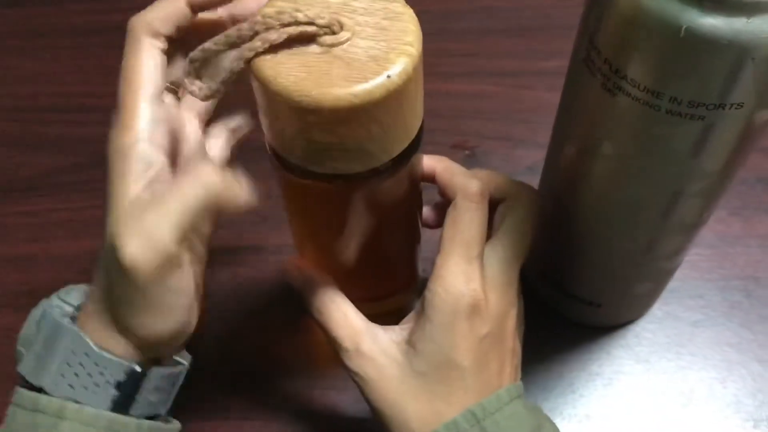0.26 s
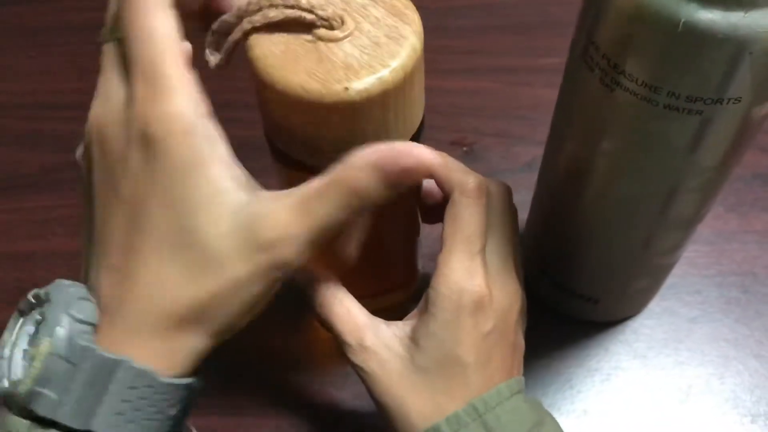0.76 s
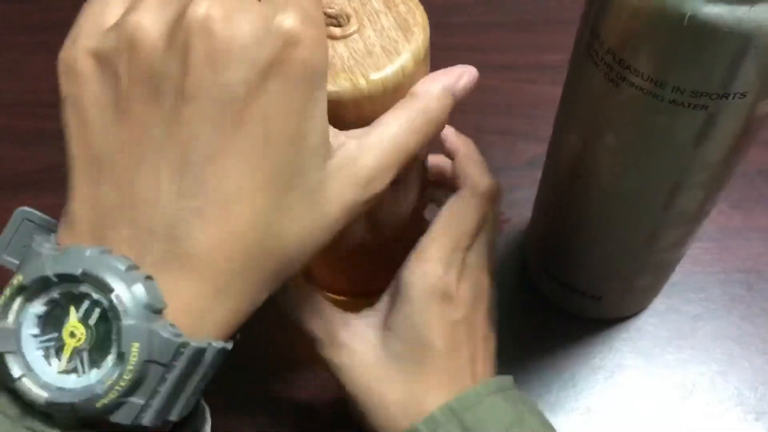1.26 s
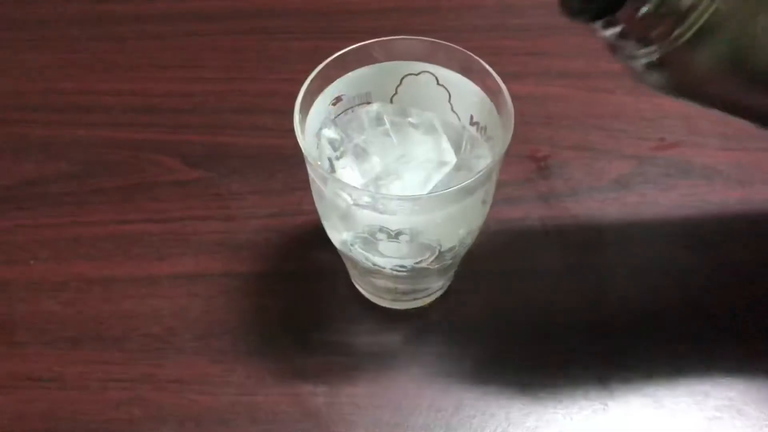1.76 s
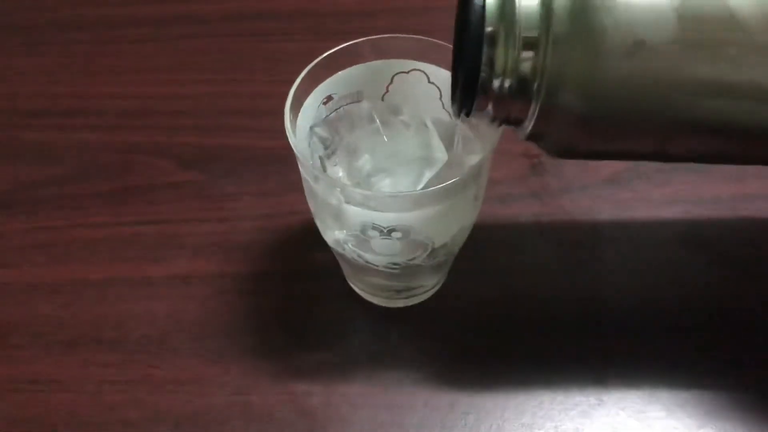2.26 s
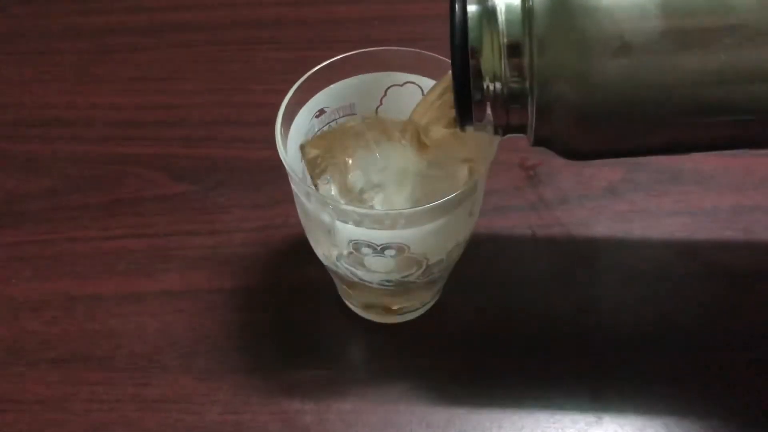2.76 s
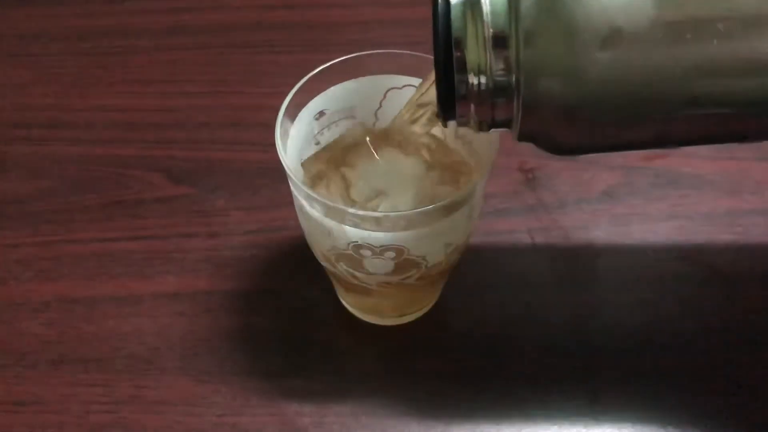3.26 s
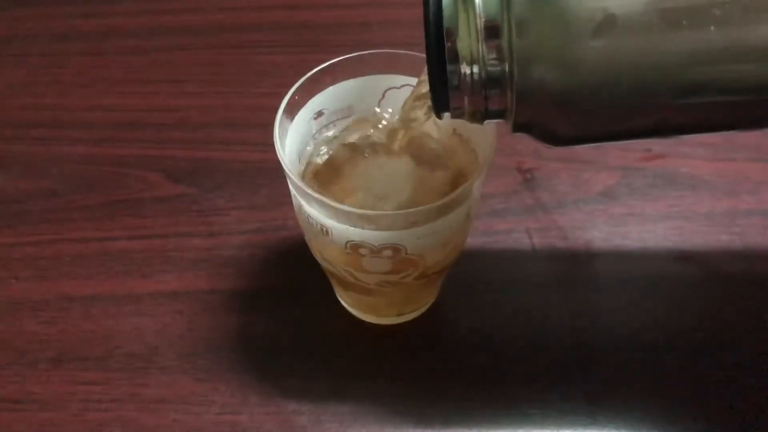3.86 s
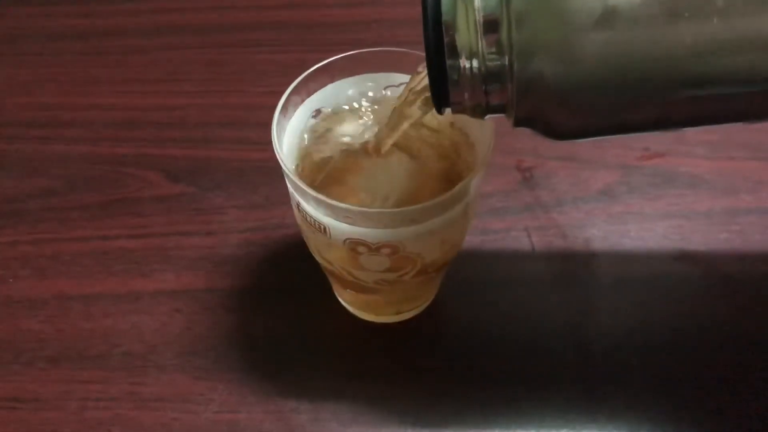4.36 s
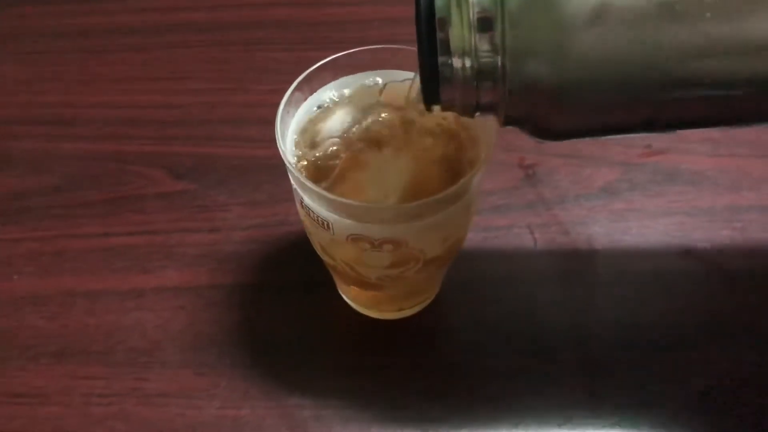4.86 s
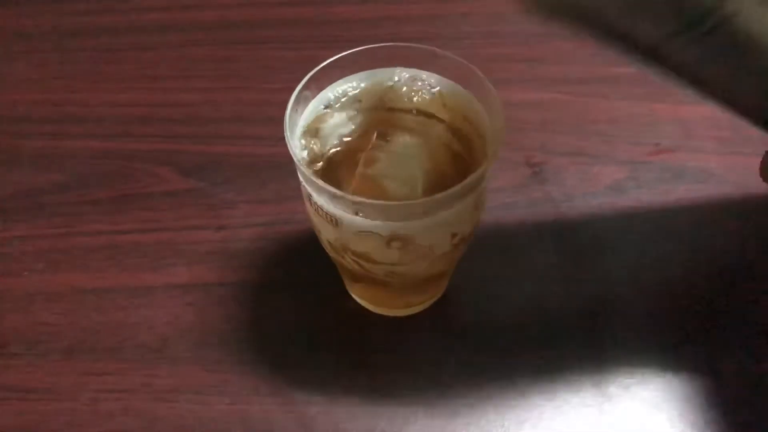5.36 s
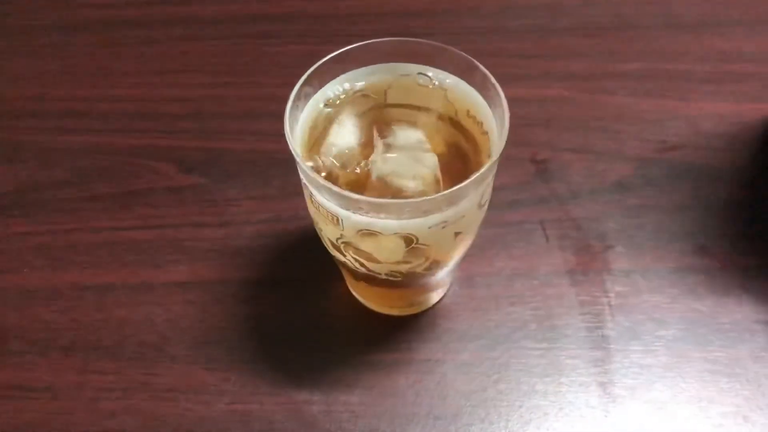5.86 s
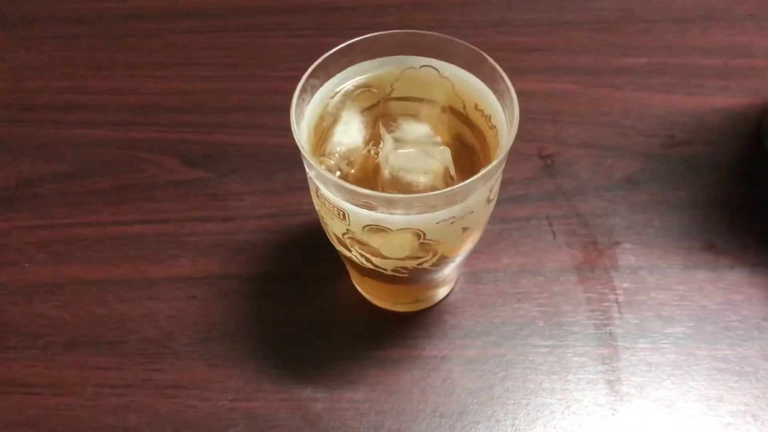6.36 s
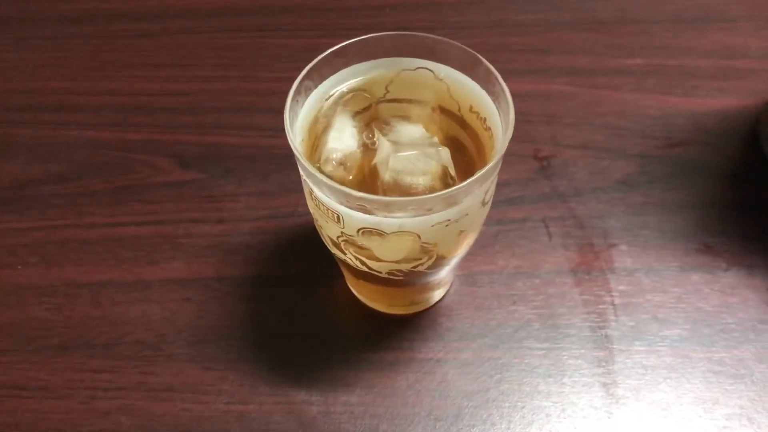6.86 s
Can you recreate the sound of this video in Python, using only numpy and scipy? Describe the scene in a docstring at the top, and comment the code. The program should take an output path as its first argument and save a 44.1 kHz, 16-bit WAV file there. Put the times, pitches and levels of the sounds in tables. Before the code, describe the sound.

Dry ticks of a glass bottle and woody knocks come first, close to the microphone, then a quiet gap. A hard steel-on-glass clink leads into a brief, lively pour with plinking bubbles, knocking cubes and tiny ice cracks. The splash softens as the glass fills, a faint hollow gurgle ends the pour, and one dull table thud follows. Small indoor room, slight reflections, steady low hum.

```python
"""In a small room, at a wooden table, a hand taps and shifts a capped glass bottle, with a rustle of sleeve.
A steel flask knocks on the rim of a tumbler, pours tea over ice, and is set down. A machine hums throughout.
Knocks, taps and clinks are fading tones (the ways an object rings) mixed with short bursts of noise.
The pour is swarms of chirping bubbles, a noisy splash and the drumming of the stream on the cubes;
the larger bubbles, the clinks and the sharper cracks are placed one by one."""
import sys
import numpy as np
from scipy import signal
from scipy.fft import rfft, irfft
from scipy.io import wavfile

SR = 44100
rng = np.random.default_rng(int(sys.argv[2]) if len(sys.argv) > 2 else 0)


def dump_mix(stems):
    """Bounce the given channels to the path in sys.argv[1] as a 16-bit WAV at rate SR."""
    frames = np.atleast_2d(stems).T  # one column per channel
    limited = np.clip(frames, -1, 1)  # hard clip at full scale
    pcm = np.round(limited * 32767).astype(np.int16)
    wavfile.write(sys.argv[1], SR, pcm)


N = 312669
T = np.arange(N) / SR  # time in the scene, seconds
AGE = np.arange(SR // 2) / SR  # time since a sound began, seconds

# How the tumbler rings when shoved or drummed on.
# Each row: pitch in Hz, level in dB, time to fall by 60 dB in seconds.
TUMBLER_MODES = [(247.3, 6, 0.095), (282, -2.5, 0.16), (539.3, -1.5, 0.096), (622, -19, 0.18),
                 (820, -10, 0.018), (1112, -13, 0.12)]
# Seconds: the tea first lands, the cubes lift off the bottom, the last drips start to die away.
POUR_S, FLOAT_S, DRY_S = 2.65, 3.82, 5.68


def undb(db):
    """Turn decibels into a gain."""
    return 10 ** (np.asarray(db) / 20)


def curve(rows):
    """Join rows of (seconds, value) by straight lines in time."""
    return np.interp(T, *np.transpose(rows))


def unit(x):
    """Scale to an rms (average strength) of 1."""
    return x / np.sqrt(np.mean(x ** 2))


def peak(x):
    """Scale to a peak of 1."""
    return x / np.abs(x).max()


def add(track, s, x):
    """Mix a sound into the track, starting at s seconds."""
    i = max(int(s * SR), 0)
    track[i:i + len(x)] += x[:max(N - i, 0)]


def cut(x, hz, kind, order=2):
    """Butterworth filter: keep the low, high or middle band of pitches."""
    sos = signal.butter(order, np.clip(hz, 10, SR / 2 - 10), kind, fs=SR, output="sos")
    return signal.sosfilt(sos, x)


def colour(x, points):
    """Shape the tone by (Hz, dB) points, with a filter that never sounds ahead of its input."""
    hz, db = np.transpose(points)
    grid = np.maximum(np.linspace(0, SR / 2, 2049), 1)
    gain = undb(np.interp(np.log(grid), np.log(hz), db))
    # Folding the cepstrum gives the minimum-phase filter, which responds as early as possible.
    cepstrum = irfft(np.log(gain))
    half = len(cepstrum) // 2
    folded = np.r_[cepstrum[0], 2 * cepstrum[1:half], np.zeros(half)]
    response = irfft(np.exp(rfft(folded)))[:half]
    return signal.fftconvolve(x, response)[:len(x)]


def fade(t60):
    """Die away smoothly, falling by 60 dB in t60 seconds."""
    return np.exp(-np.log(1000) * AGE / t60)


def burst(t60):
    """Fading noise, standing for countless ringing tones packed close together."""
    return rng.standard_normal(len(AGE)) * fade(t60)


def ring(modes, spread=0, uneven_db=0):
    """Fading tones of a struck object, a little different in pitch and strength at each blow if asked."""
    chance = rng.standard_normal((len(modes), 2))
    out = 0
    for k, ((hz, db, t60), (detune, uneven)) in enumerate(zip(modes, chance)):
        tone = np.sin(2 * np.pi * hz * (1 + spread * detune) * AGE)
        out = out + (-1) ** k * undb(db + uneven_db * uneven) * fade(t60) * tone
    return out


def bubble(hz, cycles, glide, count=1800):
    """An air bubble swells within a cycle and rings, its pitch rising as it nears the surface."""
    turns = hz * AGE[:count]
    life = turns / cycles  # 1 once the ring has fallen by 60 dB
    loudness = (1 - np.exp(-turns ** 2)) * np.exp(-np.log(1000) * life)
    return loudness * np.sin(2 * np.pi * turns * (1 + glide * np.minimum(life, 1) / 2))


def specks(rate, scatter_db):
    """Random single clicks of very uneven size, about `rate` of them a second."""
    size = undb(scatter_db * np.minimum(rng.exponential(size=N), 4))
    return (rng.random(N) < rate / SR) * size * rng.choice([-1, 1], N)


def swarm(rate, low_hz, high_hz, cycles, scatter_db, count=700):
    """Bubbles of random size and loudness, each pitched by its radius; scaled to rms 1."""
    out = np.zeros(N)
    for when, radius, size, life in rng.random((int(rate * N / SR), 4)):
        gain = undb(-scatter_db * np.log(size + 0.0018))
        hz = high_hz * (low_hz / high_hz) ** radius
        one = bubble(hz, cycles * (.5 + life), glide=.16, count=count)
        add(out, when * N / SR, gain * one)
    return unit(out)


def swell(start, end, rise_db_per_s, fall_db_per_s):
    """A gain that rises to 1, holds from start to end (seconds) and dies away."""
    before, after = np.maximum(start - T, 0), np.maximum(T - end, 0)
    return undb(-rise_db_per_s * before - fall_db_per_s * after)


def drone(hz, width_hz, steady):
    """A wavering low tone: a steady part plus a narrow band of rumble."""
    waver = [unit(cut(rng.standard_normal(N + SR), width_hz, "low")[SR:]) for _ in range(2)]
    phase = 2 * np.pi * np.cumsum(hz * np.ones(N)) / SR
    return unit((steady + waver[0]) * np.sin(phase) + waver[1] * np.cos(phase))


def background():
    """Low drones of a machine, the middle one swelling for a while, over the hiss of the room."""
    # Tone of the room hiss. Each row: pitch in Hz, level in dB.
    air_colour = [(59, -18), (100, 3), (140, -14.5), (202, -17.5), (224, -26), (315, -21.5), (433, -28.5),
                  (608, -27.5), (705, -29.5), (1550, -35.5), (2170, -40.5), (16000, -58)]
    # The 94.9 Hz drone swells: full from and until in seconds, rise and fall in dB per second.
    hum_swell = (4.18, 5.86, 19.4, 8.7)
    air = cut(colour(rng.standard_normal(N), air_colour), 158, "high", order=3)
    air = air / np.std(cut(air, 300, "high", order=4))  # its part above 300 Hz sets the level
    low = drone(61.7, width_hz=7, steady=2.0) * undb(-56.5)
    upper = drone(94.9, width_hz=8, steady=3.04) * undb(-49.5) * swell(*hum_swell)
    rumble = drone(104.6, width_hz=9.5, steady=1.76) * undb(-56.5)  # a rougher drone beside it
    return air * undb(-61) + cut(low + upper + rumble, 42.5, "high", order=4)


def sleeve():
    """Soft, grainy rustle of cloth that swells and fades with each move of the arm."""
    # Tone of the cloth. Each row: pitch in Hz, level in dB.
    cloth_colour = [(300, 13.5), (1200, 9.5), (4000, 2), (9000, -7), (15000, -23)]
    # Each row: loudest moment in seconds, level in dB, rise in seconds, fall in seconds.
    brushes = [(0.01, -55.5, .05, 0.039), (1.3, -61, 0.19, .1), (1.83, -62.5, 0.17, 0.39)]
    moves = np.zeros(N)
    for s, db, rise, fall in brushes:
        moves += undb(db) * np.exp(-((T - s) / np.where(T < s, rise, fall)) ** 2)
    return unit(colour(specks(rate=5000, scatter_db=1.5), cloth_colour)) * moves


def table():
    """The top booms at a pitch set by where it is loaded; soft contacts leave out its higher modes."""
    # Knocks. Each row: start in seconds, level in dB, boom pitch in Hz, contact cut-off in Hz.
    knocks = [(0.01, -27.5, 236, 1540), (.0770, -25.5, 213, 1020), (0.472, -34.5, 282, 980),
              (0.505, -27.5, 283, 1390), (.542, -29.5, 288, 1690), (.5570, -22, 210, 755),
              (0.575, -32, 220.6, 590), (.843, -38, 219, 705), (0.897, -38, 220, 1520),
              (1.18, -34.5, 217, 600), (6.34, -29.5, 274, 470)]
    # Ringing of the wood. Each row: pitch in Hz, level in dB, time to fall by 60 dB in seconds.
    wood_modes = [(161, -12, .18), (278, -5, .14), (512, -5, .1), (712, -8, .1), (830, -9, .08),
                  (1010, -9, .08)]
    middle_hz, stiff_db_per_hz = 213, -0.04  # away from its middle the top is stiffer: higher and weaker
    hard_db_per_khz = -10  # the harder the contact, the less boom
    out = np.zeros(N)
    for s, db, boom_hz, contact_hz in knocks:
        boom_db = -0.5 + hard_db_per_khz * contact_hz / 1000 + stiff_db_per_hz * (boom_hz - middle_hz)
        thud = peak(cut(burst(0.048), [260, 2200], "band", order=1))
        plate = undb(-14.5) * ring(wood_modes, spread=0.022) + thud
        boom = ring([(boom_hz, boom_db, .15)]) * (1 - fade(0.015))
        add(out, s, undb(db) * peak(cut(plate, contact_hz, "low", order=3) + boom))
    return out


def bottle():
    """Each tap of the fingers is a dry tick together with the ring of the bottle wall."""
    # Taps. Each row: start in seconds, level in dB, high ring over low ring in dB.
    taps = [(0.0181, -28, 0.5), (0.1007, -44, -9), (0.4693, -25.5, 10.5), (0.5061, -33, 4),
            (0.5163, -29, -1), (0.5726, -37.5, -7), (0.8406, -33, 3), (0.8769, -40.5, -8)]
    # Low and high ring of the wall. Each row: pitch in Hz, level in dB, time to fall by 60 dB in seconds.
    low_modes = [(2245, 6.5, 0.044), (2900, 2, 0.049), (3716, 4, 0.081)]
    high_modes = [(5400, -16, 0.046), (5670, 5.5, 0.032), (6030, 4, 0.024)]
    out = np.zeros(N)
    for s, db, tilt_db in taps:
        tick = cut(cut(burst(0.032), 680, "high", order=1), 8100, "low")
        low = undb(-tilt_db / 2) * ring(low_modes, spread=0.0084)
        high = undb(tilt_db / 2) * ring(high_modes, spread=0.0023)
        add(out, s, undb(db) * peak(peak(tick) + undb(-12.5) * (low + high)))
    return out


def rim():
    """Steel on glass: a hard crack, a short ring, and a thump as the blow reaches the table."""
    # Each row: start in seconds, level in dB, body in dB, treble edge in Hz, singing glass in dB.
    hits = [(2.2435, -12, -5, 9600, -58), (2.3893, -27.5, -6.5, 5460, -43)]
    # Tumbler and flask in contact. Each row: pitch in Hz, level in dB, time to fall by 60 dB in seconds.
    contact_modes = [(214, 1, .2), (247, -1, .2), (264, -4, .24), (515, 3, .07), (727, -11, .14),
                     (826, -8, .12), (1114, -7, .18), (1841, -11, .13), (4091, -16, .12), (4980, -17, .11),
                     (6304, -16, .1), (6788, -20, .11), (7434, -19, .1), (8489, -22, .12)]
    # Singing glass. Each row: pitch in Hz, level in dB, time to fall by 60 dB in seconds.
    glass_modes = [(8560, 0, .6), (12050, -3, .6)]
    # Tone of the crack. Each row: pitch in Hz, level in dB.
    crack_colour = [(300, -2), (1000, -30), (2200, 5), (3200, -8.5), (4300, -3), (6500, 0.5), (8400, -2.5),
                    (9500, -10.5), (16000, -7)]
    out = np.zeros(N)
    for s, db, body_db, edge_hz, sing_db in hits:
        crack = peak(colour(burst(0.0088) + undb(-12.0) * burst(0.048), crack_colour))
        crack = cut(crack, edge_hz, "low", order=1)
        thump = peak(cut(burst(0.075), [300, 1000], "band"))
        body = undb(-9) * ring(contact_modes) + undb(-2) * thump
        add(out, s, undb(db) * (crack + undb(sing_db) * ring(glass_modes)))
        add(out, s + 0.001126, undb(db + body_db) * body * (1 - fade(0.0021)))
    return out


def flask():
    """A soft, hollow gurgle as tea runs back inside the steel flask, made of a swarm of bubbles."""
    # The flask is tipped up: gurgle full from and until in seconds, rise and fall in dB per second.
    slosh = (5.25, 5.4, 22, 50)
    gurgle = swarm(rate=260, low_hz=700, high_hz=1250, cycles=50, scatter_db=2, count=3000)
    return gurgle * undb(-62.5) * swell(*slosh)


def clinks():
    """Wet cubes knock on each other and the glass: contact noise, ringing wall and hollow air above the tea."""
    # Each row: start in seconds, level in dB.
    hits = [(2.994, -24), (3.0281, -27.5), (3.1212, -26), (3.1455, -21.5), (3.4792, -33.5), (3.689, -28.5),
            (3.7667, -28.5), (3.805, -36), (5.1238, -40), (5.293, -39), (5.3365, -39.5), (5.5016, -42.5),
            (5.59, -33), (5.7027, -43), (5.7239, -38.5), (5.8036, -41), (5.82, -48), (5.8782, -43.5),
            (5.907, -40)]
    # Tone of the contact. Each row: pitch in Hz, level in dB.
    contact_colour = [(400, 19.5), (1400, 5), (3400, 10), (6000, 0), (10000, -3), (16000, -8)]
    # Wall of the filled tumbler. Each row: pitch in Hz, level in dB, time to fall by 60 dB in seconds.
    wall_modes = [(2238, 0, 0.029), (3460, -6, 0.04), (3820, -11, 0.031), (5347, 12, 0.009),
                  (6360, 12, 0.01), (8330, -14.5, 0.068), (11950, -14.5, .05)]
    out = np.zeros(N)
    for s, db in hits:
        air_db = 4 - 6.5 * (s - POUR_S)  # the air above the tea rings less as the glass fills
        contact = peak(colour(burst(0.01) * (1 - fade(0.0099)), contact_colour))
        wall = peak(ring(wall_modes, spread=0.043, uneven_db=7.5) * (1 - fade(0.013)))
        hollow = peak(cut(burst(0.01) * (1 - fade(0.005)), [1500, 2050], "band"))
        add(out, s, undb(db) * peak(contact + undb(-8.5) * wall + undb(air_db) * hollow))
    return out


def cracks():
    """The ice splits as it warms: a tiny snap of noise around one pitch."""
    # Each row: start in seconds, level in dB, centre pitch in Hz.
    splits = [(2.487, -41.5, 9500), (2.6181, -24.5, 4260), (2.672, -35, 11200), (3.3388, -34.5, 8600),
              (3.3865, -30, 8550), (3.4084, -32, 7210), (4.302, -37, 10300), (4.9115, -31.5, 11000),
              (6.0925, -46, 8000), (6.405, -47.5, 9500), (6.6782, -50, 14300)]
    out = np.zeros(N)
    for s, db, hz in splits:
        snap = burst(0.0015) + undb(-31.5) * burst(0.011)
        add(out, s, undb(db) * peak(cut(snap, [hz * 0.71, hz * 1.45], "band")))
    return out


def shoves():
    """Cubes shove the tumbler against the table: its low ring and a dull thud."""
    # Each row: start in seconds, level in dB.
    pushes = [(2.683, -46), (2.711, -33), (2.778, -34), (2.843, -31.5), (2.866, -26.5), (2.962, -30),
              (3.031, -40), (3.305, -42), (3.488, -32), (3.77, -32.5)]
    out = np.zeros(N)
    for s, db in pushes:
        glass = peak(ring(TUMBLER_MODES, spread=0.025, uneven_db=2.0))
        thud = peak(cut(burst(0.047), [220, 1100], "band"))
        body = glass + undb(0.5) * thud
        add(out, s, undb(db) * peak(body * (1 - fade(0.0029))))
    return out


def ticks():
    """Tiny snaps all over the ice once it is wet, slowly getting quieter."""
    snaps = signal.fftconvolve(specks(rate=40, scatter_db=5.5), burst(0.0013))[:N]
    since_pour = T - POUR_S
    level_db = -72 - 2 * since_pour
    return unit(cut(snaps, [4500, 12000], "band")) * undb(level_db) * (since_pour > 0)


def plinks():
    """The larger bubbles, each with the splash that traps it and a few smaller ones in its wake."""
    # Bubbles pinching off under the stream. Each row: start in seconds, level in dB, starting pitch in Hz.
    bubbles = [(2.7093, -33.5, 1600), (2.7417, -35.5, 3530), (2.7772, -30.5, 1616), (2.792, -33, 1870),
               (2.824, -28.5, 3260), (2.8567, -27.5, 1950), (2.8798, -26.5, 1600), (2.902, -31.5, 1190),
               (2.9413, -26.5, 1780), (2.973, -29, 1340), (3.0786, -29, 1684), (3.137, -27.5, 1620),
               (3.1728, -36.5, 2020), (3.403, -37, 1680), (3.545, -36.5, 681), (3.623, -36.5, 1830),
               (3.7319, -27.5, 1707), (3.992, -37, 1830), (4.0387, -32.5, 1910), (4.119, -36.5, 3470),
               (4.2063, -33.5, 1860), (4.262, -40, 3380), (4.3518, -39.5, 1850), (4.459, -47, 3300),
               (4.6349, -41, 1750), (4.7463, -39.5, 3980)]
    shed_db, latest_s, octaves = -15.5, .016, 0.957  # small ones: level, latest delay, highest pitch above
    out = np.zeros(N)
    for s, db, hz in bubbles:
        tone = peak(bubble(hz, cycles=42, glide=.16))
        splash = cut(burst(0.012) * (1 - fade(0.0026)), [hz * 0.58, hz * 1.35], "band")
        splash = peak(splash)[:len(tone)]
        add(out, s, undb(db) * peak(tone + undb(-2.5) * splash))
        for late, higher in rng.random(size=(3, 2)):
            shed = bubble(hz * 2 ** (octaves * higher), cycles=42, glide=.25)
            add(out, s + latest_s * late, undb(db + shed_db) * shed)
    return out


def stream():
    """The stream drums on the cubes and churns small bubbles in among them; the finest fizz at the surface."""
    # Strength of the stream. Each row: time in seconds, level in dB against full flow.
    flow = [(2.7, -14.5), (2.9, 0.5), (3.22, -11.5), (3.42, -6), (3.58, -19.5), (4.1, -9.5), (4.6, -18)]
    # Tone of the splash. Each row: pitch in Hz, level in dB.
    splash_colour = [(200, 3), (500, 5), (1000, -11.5), (1800, 2), (2500, -1.5), (3300, 3.5), (6000, -4.5),
                     (16000, -41)]
    flow_db = curve(flow)
    onset, lift_off, drip = 130, 174, 23  # dB per second: build-up, end of the drumming, dying drips
    flowing = swell(POUR_S, DRY_S, onset, drip)
    grounded = swell(POUR_S, FLOAT_S, onset, lift_off)  # while the cubes rest on the bottom

    churn = swarm(rate=420, low_hz=900, high_hz=6000, cycles=36, scatter_db=5, count=1600)
    patter = unit(signal.fftconvolve(specks(rate=510, scatter_db=12.5), burst(0.007))[:N])
    splash = unit(colour(churn + undb(-10.5) * patter, splash_colour))
    fizz = swarm(rate=500, low_hz=5000, high_hz=15500, cycles=20, scatter_db=5, count=300)

    # Each gush rings the tumbler and thumps the pockets of air between the cubes.
    gushes = specks(rate=110, scatter_db=3.5)
    glass = unit(signal.fftconvolve(gushes, ring(TUMBLER_MODES))[:N])
    pockets = unit(cut(signal.fftconvolve(gushes, burst(0.051))[:N], [330, 1150], "band"))
    drumming = unit(undb(3.5) * glass + pockets)

    # Fizz weakens by 2 dB a second as the tea covers the cubes; drumming barely follows the flow.
    fizz_db = -53.5 + 0.95 * flow_db - 2 * np.maximum(T - POUR_S, 0)
    drum_db = -49.5 + 0.1 * flow_db
    liquid = splash * undb(-49 + flow_db) + fizz * undb(fizz_db)
    return flowing * (liquid + grounded * drumming * undb(drum_db))


def tumbler(x, echo_db, t60):
    """Sound bounces between the tea and the glass wall on its way out, adding short bright echoes."""
    echoes = cut(burst(t60) * (1 - fade(0.005)), 2250, "high", order=1)
    return x + undb(echo_db) * signal.fftconvolve(x, echoes / np.linalg.norm(echoes))[:N]


def room(x, wet_db, t60):
    """Close reflections from the table and walls, duller than the direct sound."""
    tail = cut(burst(t60) * (1 - fade(0.074)), [170, 6000], "band", order=1)
    return x + undb(wet_db) * signal.fftconvolve(x, tail / np.linalg.norm(tail))[:N]


def scene():
    """Mix the handling and the pouring, each with its reflections, over the sleeve and the background."""
    handling = room(bottle() + table() + rim(), wet_db=-15, t60=0.26)
    ice = clinks() + cracks() + shoves() + ticks()
    inside = tumbler(plinks() + ice + stream(), echo_db=-6, t60=.022)
    pouring = room(inside + flask(), wet_db=-15, t60=0.21)
    return (handling + pouring + sleeve() + background())[None]


def record(dry):
    """The recorder cuts steeply above 16000 Hz."""
    return signal.sosfilt(signal.ellip(10, .2, 70, 16000, fs=SR, output="sos"), dry)


dry = scene()
out = record(dry)
dump_mix(out)
```